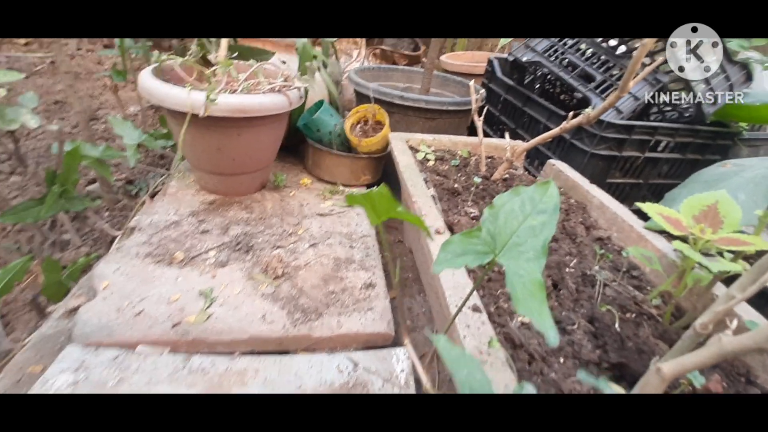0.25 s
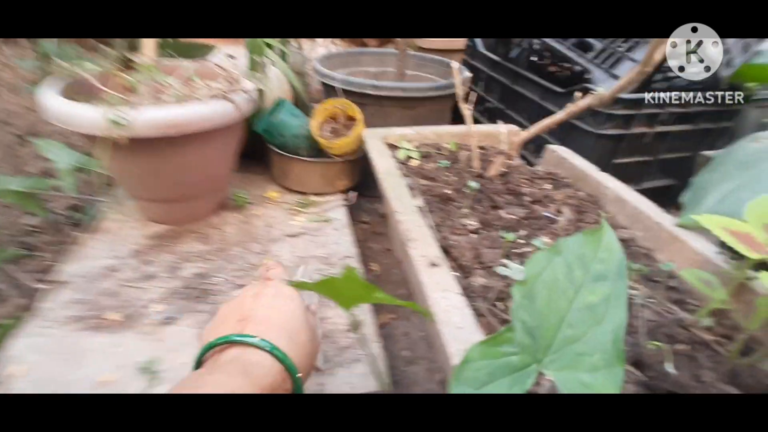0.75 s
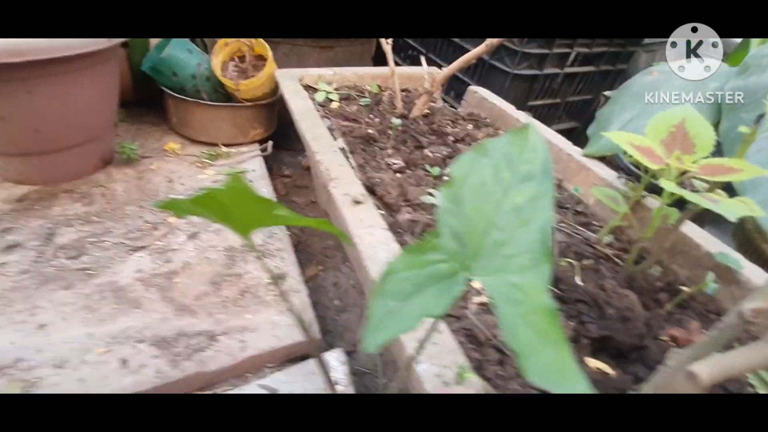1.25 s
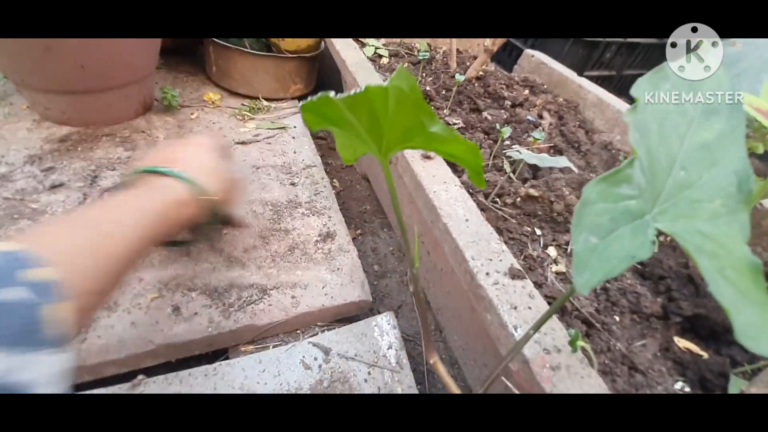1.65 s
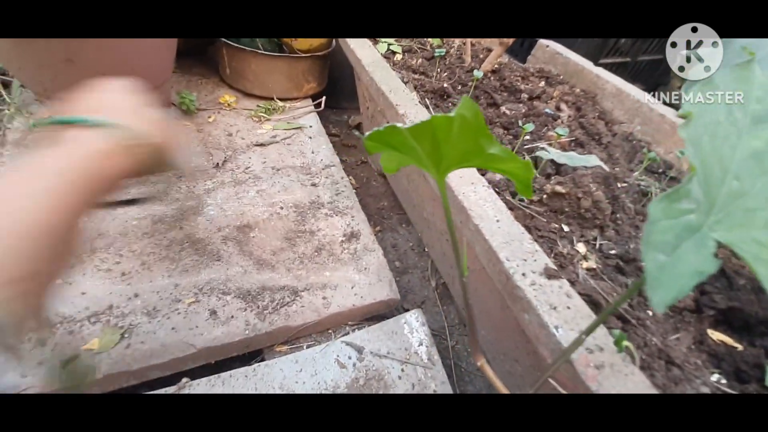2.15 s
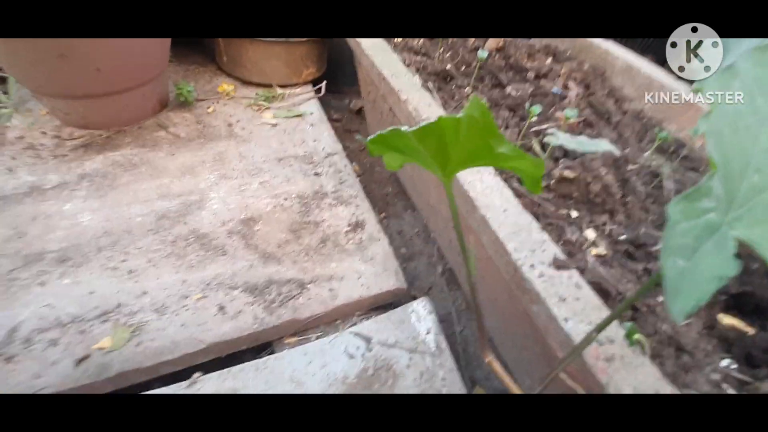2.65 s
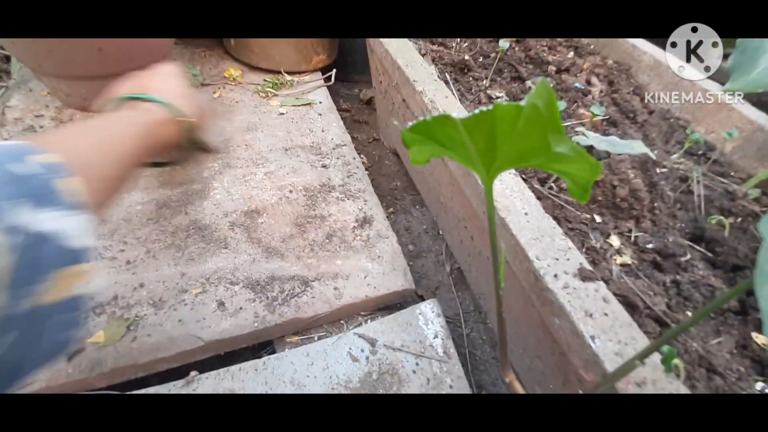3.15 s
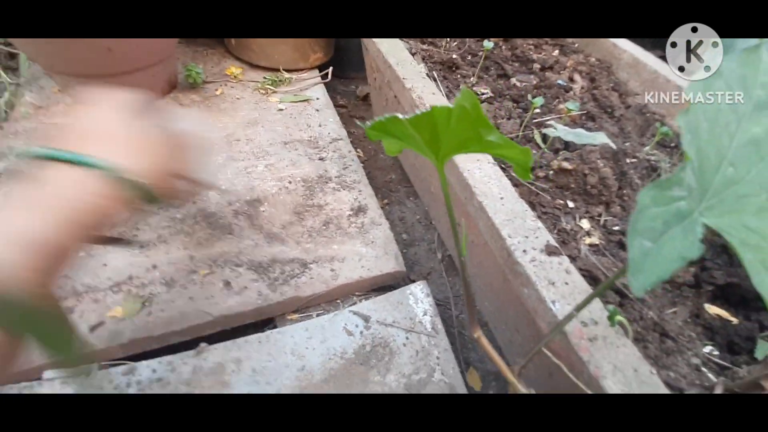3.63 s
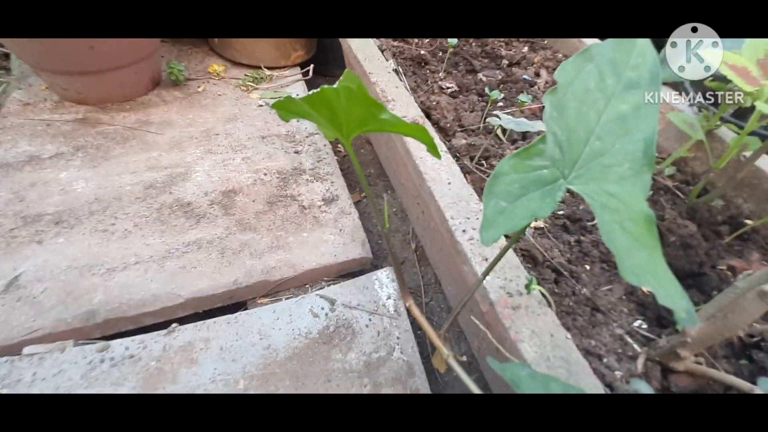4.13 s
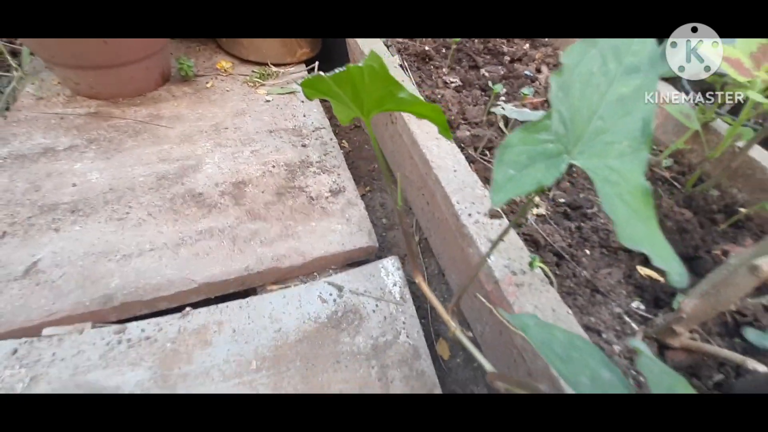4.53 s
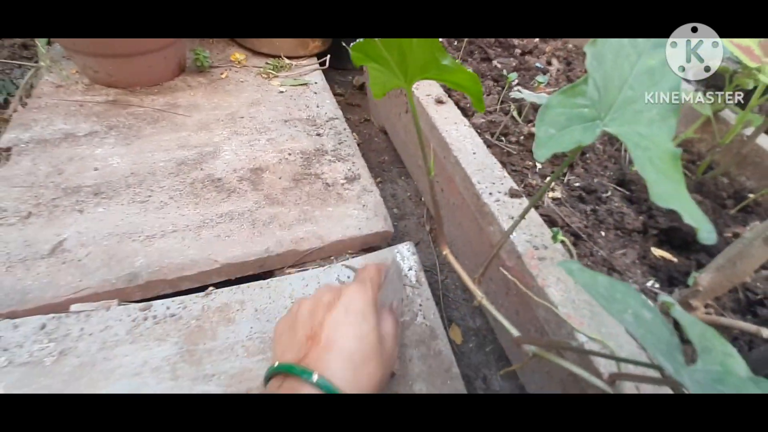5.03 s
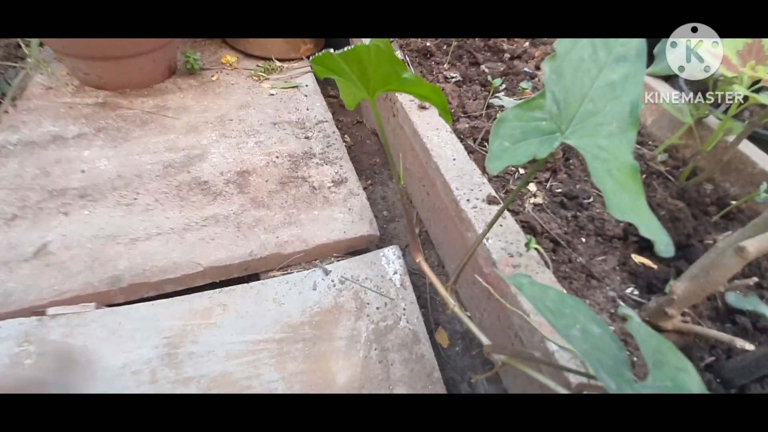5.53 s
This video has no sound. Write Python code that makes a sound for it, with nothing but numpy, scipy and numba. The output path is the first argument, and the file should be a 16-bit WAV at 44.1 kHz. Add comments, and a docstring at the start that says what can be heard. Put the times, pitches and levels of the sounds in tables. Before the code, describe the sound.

Close up outdoors, a scraper works dirt off a concrete slab: soft sweeps first, then repeated coarse rasps with brief squeaky chatter and clicks as the edge lands. Crumbs skitter after strokes and cloth rustles faintly in the gaps. Near the end come quick bright taps around a light scrape, then quiet. A handheld phone adds muffled handling thuds over low, wavering air rumble.

```python
"""At arm's length from a handheld phone with two microphone ports, a flat scraper works on a concrete slab.
First two light strokes push loose dirt: filtered grain clicks that hiss. From 1 s to 4.7 s the bare edge
rasps in seven strokes: grain clicks drive drifting modes, and decaying modes make the taps of landing.
From 5.1 s come more taps and a last light stroke. Between strokes crumbs and a sleeve rustle as filtered clicks;
throughout, fingers bump the phone (filtered pulses) and the garden rumbles (shaped noise) behind a faint echo."""
import sys
import numpy as np
from scipy import signal
from scipy.fft import rfft, irfft, next_fast_len
from scipy.io import wavfile
from scipy.ndimage import uniform_filter1d, map_coordinates
from numba import njit

SR = 44100
rng = np.random.default_rng(int(sys.argv[2]) if len(sys.argv) > 2 else 0)


def digitize_waveform(pressure):
    """Quantize a signal to 16-bit integers and store it at the path in sys.argv[1].

    Rows of a 2-D input are taken as channels; values are limited to [-1, 1].
    """
    field = np.atleast_2d(pressure).T
    bounded = np.clip(field, -1, 1)
    quanta = np.round(bounded * 32767).astype(np.int16)
    wavfile.write(sys.argv[1], SR, quanta)


N = 254898
T = np.arange(N) / SR  # t/s
SIZE = next_fast_len(N + SR, True)  # transform length, with a second to spare
HZ = np.maximum(np.arange(SIZE // 2 + 1) * SR / SIZE, 1)  # f/Hz of each transform bin

# Levels in the tables are relative; some sources add an overall trim.
# Bare edge on concrete: [bite t/s, hardest push t/s, lift t/s, level/dB, bite re hardest level/dB,
# lift re hardest level/dB, flexing at the lift level/dB]
SCRAPES = [ (1.004, 1.146, 1.248, -9.5, -12, -9, -2), (1.692, 1.850, 1.922, -10, -6, -9, 3.5),
           (2.430, 2.560, 2.651, -11, -3, -7, -5.5), (3.103, 3.122, 3.129, -31, -1, 0, -1),
           (3.165, 3.370, 3.452, -12.5, -5.5, 0, -8), (3.925, 4.079, 4.147, -9.5, -3.5, -1.5, -0.5),
           (4.598, 4.67, 4.713, -23.5, 0.5, -1, -13)]
# Light strokes through loose dirt: same columns as SCRAPES
SWEEPS = [ (0.195, 0.27, 0.28, -21.5, 0, 1, -11.5), (0.644, 0.767, 0.7745, -22, -10, -4, -22.5),
          (5.186, 5.304, 5.412, -19.5, 1.5, -2.5, 3.5)]
# Moments where the edge skims and loses grip (level drops) or the hand pushes in a surge (level rises): [t/s,
# change of level/dB]
GRIPS = [(0.238, -6.5), (1.734, 3.5), (1.788, -8.5), (3.224, -4), (3.258, 2), (3.31, -6.5), (4.05, 2),
         (4.649, 1.5), (5.239, -10), (5.37, -6.5)]
# The edge catches and chatters near one mode: [t/s, f/Hz, glide/(Hz/s), level/dB]
CHATTER = [(1.081, 3070, -2, -18), (1.17, 5310, -4, -15), (1.865, 2243, -1.5, -13),
           (2.526, 2883, -3000, -13.5), (2.578, 2035, 1999.5, -10.5), (3.259, 3142, 2997.5, -15.5),
           (3.275, 1319, -2.5, -11), (3.372, 4884, -3000, -11.5), (3.4, 2910, 1, -10.5),
           (4.139, 2084, 7.5, -10), (4.62, 3217, 9000, -22), (4.668, 2280, 3000, -27.5)]
# The edge lands or hits a stone: [t/s, level/dB, then re that: low flexing level/dB,
# lowest modes level/dB, upper modes level/dB, crushed grit level/dB; damping factor]
TAPS = [ (0.205, -2.5, -32, -18, -2, -26, 0.67), (0.2165, -16, -32, -20, -1, -12, 0.4),
        (0.964, -14, -1.5, 10, -9, -13, 1.24), (1.659, -6.5, -7.5, 8, -10, -10, 0.65),
        (2.382, -7.5, -14, 0.5, -15, -18.5, 1.26), (3.095, -9, -12, -6.5, -20, -20.5, 1.4),
        (3.893, -22.5, 0.5, 3, -7.5, -5.5, 0.8), (4.575, -9, -8.5, -13, 1, -9.5, 0.69),
        (4.693, -19, 8.5, -4, 12, 8, 1.8), (4.706, -25.5, 5.5, -12, 0, 1.5, 1.2),
        (5.134, -50, 22, 2, 6, -6, 1.7), (5.158, -17.5, -1.5, 3, -9, -5.5, 1.5),
        (5.176, -11, -5, 6.5, -4, -5.5, 0.94), (5.198, -1, -14, 6.5, -4.5, -3, 0.99),
        (5.254, -11.5, -7, 15, -14, -3.5, 0.83), (5.356, -8.5, -8, -10, 5, 2, 1.8),
        (5.379, -3, -13.5, -10, 4.5, 2, 0.81), (5.388, -5, -21, -7.5, 10.5, 5.5, 0.42),
        (5.405, -2.5, -16, -19, 4, -4, 0.85)]
# Modes of the scraper: [f/Hz, undamped width/Hz, rubbed level/dB, struck level/dB]
MODES = [(1212, 84, -1.5, -0.5), (2036, 52, -1, -1), (2263, 110, -8, -2.5), (2680, 170, -13, -12),
         (2931, 53, 5.5, -5), (3765, 88, -16.5, -5), (4180, 320, -9.5, 1.5), (4920, 240, -6, -0.5),
         (5020, 96, -5, -1), (6492, 120, 7, -18), (11074, 980, -9.5, -19), (12040, 2300, -19.5, -21)]
# Slow flexing of the scraper in the hand: [f/Hz, width/Hz, level/dB]
FLEX = [(233, 22, -6.5), (297.6, 97, 0), (360, 60, -0.5), (482, 150, -5)]
# Colour of grit under the edge: [f/Hz, level/dB]
GRIT = [(150, -23.5), (260, -15), (480, -5), (700, -6), (1050, 1.5), (2700, 0), (4000, -5.5), (5500, 2),
        (7500, -17.5), (9600, -21), (11800, -13), (15500, -26)]
# Colour of loose dirt: [f/Hz, level/dB]
LOOSE_DIRT = [(300, -11), (1000, 0), (2000, 0.5), (5200, 2.5), (7500, -7.5), (9600, -9.5), (12000, -10.5),
              (15500, -14.5)]
# Rustles of crumbs, sleeve and fingers: [t/s, half length t/s, level/dB, centre f/Hz, filter width/Hz]
RUSTLES = [(0.306, 0.1, -51.5, 1650, 2600), (0.547, 0.11, -54.5, 3230, 8900),
           (1.539, 0.041, -39.5, 170, 500), (2.062, 0.098, -54.5, 4800, 9860),
           (2.829, 0.023, -47.5, 5560, 12200), (4.356, 0.0017, -43.5, 3980, 4900),
           (4.386, 0.02, -47.5, 887, 1490), (4.793, 0.0091, -52, 4800, 11000),
           (5.033, 0.026, -52, 2900, 2000), (5.526, 0.078, -51.5, 4430, 8940)]
# Fingers on the phone, mostly beside the right port: [t/s, thud level/dB, knock re thud level/dB,
# left minus right level/dB]
BUMPS = [ (.287, -14, 8.5, -29.5), (0.441, -17.5, -12.5, -24), (.452, -26.5, 3, -23.5),
         (.791, -18, -17, -25), (1.076, -19, -12, -21.5), (1.333, -28, -36.5, -19.5),
         (1.416, -21.5, -16, -27), (2.519, -21, -15, -12.5), (2.981, -25.5, -36, -25.5),
         (3.297, -22.5, -21.5, -24.5), (3.639, -24, -45, -26.5), (4.38, -27.5, -2.5, -31),
         (5.38, -11.5, -15, 23), (5.574, -19.5, 0.5, -39), (5.643, -25.5, -12, -44)]
# Colour of a thud through the case: [f/Hz, level/dB]
BUMP = [(25, -39), (55, 1), (110, 5.5), (350, -9.5), (2000, -65)]
# Colour of the short knock: [f/Hz, level/dB]
KNOCK = [(80, -10), (300, 5.5), (700, -6.5), (1300, -17.5), (5000, -80)]
# Colour of the garden air: [f/Hz, level/dB]
GARDEN = [(22, -32.5), (50, -12.5), (130, -3), (400, -20.5), (900, -33), (2500, -31.5), (8000, -36.5),
          (10000, -38.5), (15000, -39)]
# Course of the low rumble: [t/s, level/dB]
RUMBLE = [(0.1, -3.5), (1.7, 6), (2.2, -8), (5.1, -2), (5.75, -10.5)]
# Balance of the two microphone ports: [f/Hz, left minus right level/dB]
PORT_BALANCE = [(300, 0.5), (1000, 1.5), (1500, -4), (3000, -1.5), (4500, -4), (6300, -0.5), (8000, 19),
                (10000, 11), (12000, 1.5), (15000, 6.5)]
# Sound common to both ports: [f/Hz, share of power]
PORT_LIKENESS = [(300, 1), (1200, 0.56), (2500, 0.36), (5000, 0.046), (12000, 0.66)]
# Lag of the right port, shorter in the bass: [f/Hz, lag t/s]
PORT_LAG = [(300, 0.00022), (1500, 0.00033)]

GARDEN_DB = -45.5  # base level/dB
TOP_HZ = 15600  # upper limit of the microphone f/Hz
GRIP_S = 0.011  # half length of each skim or surge t/s
DRAG_FLEX_DB, FLEX_RISE_S = -17.5, 0.052  # little flexing in mid-stroke, more as it tips up to lift


def scrapes(level_db=-0.87, flex_db=-1, ring_db=3, grit_db=-2.5, fine_db=-3, fine_per_db=0.2064,
            wander_db=5, judder_db=1.0, bite_db_per_s=1100, lift_db_per_s=1400, drift=0.017,
            stones_db=-10.5):
    """The edge judders over grit; its modes swell, fade and bend as the contact point shifts."""
    force_db, low_db = controls(SCRAPES, bite_db_per_s, lift_db_per_s)
    force = undb(force_db)
    push = grains(5000, 3.7) * undb(judder_db * walk(330) + 1.6 * walk(70))
    rasp = undb(grit_db) * patchy(filtered(push, colour(GRIT)))
    for hz, width, db, _ in MODES:
        gain = undb(db + ring_db + wander_db * walk(38))
        bent_hz = hz * (1 + drift * walk(30))
        rasp = rasp + gain * ringing(push, bent_hz, float(width))
    rasp = steady(hollowed(rasp)) + undb(stones_db) * stones()
    # a harder push crushes finer grit
    rasp = brighten(rasp, fine_db + fine_per_db * force_db)
    return undb(level_db) * force * rasp + flexing(push * force * undb(low_db + flex_db))


def controls(strokes, bite_db_per_s, lift_db_per_s):
    """Strokes bite, arch up to the hardest push, ease and lift: gives force and flexing level/dB."""
    levels, flexes = [], []
    for bite, hardest, lift, db, bite_db, lift_db, flex_db in strokes:
        before = np.clip((hardest - T) / (hardest - bite), 0, 1)
        after = np.clip((T - hardest) / (lift - hardest), 0, 1)
        off_slab = bite_db_per_s * np.maximum(bite - T, 0) + lift_db_per_s * np.maximum(T - lift, 0)
        levels.append(db + bite_db * before ** 2 + lift_db * after ** 2 - off_slab)
        tipped = np.exp(-(np.maximum(lift - T, 0) / FLEX_RISE_S) ** 2)
        flexes.append(DRAG_FLEX_DB + (flex_db - DRAG_FLEX_DB) * tipped)
    grip_db = sum(db * np.exp(-((T - s) / GRIP_S) ** 2) for s, db in GRIPS)
    strongest = np.argmax(levels, axis=0)
    return np.max(levels, axis=0) + grip_db, np.choose(strongest, flexes)


def patchy(push, depth_db=6, shifts_per_s=36, patch_hz=210):
    """Each patch of concrete grips differently, so bright spots keep shifting through the rasp."""
    hz, s, cells = signal.stft(push, SR, nperseg=512, noverlap=384)
    places = np.meshgrid(hz / patch_hz, s * shifts_per_s, indexing="ij")
    spots = map_coordinates(rng.standard_normal((256, 1024)), places, order=3, mode="wrap")
    _, sound = signal.istft(cells * undb(depth_db * spots), SR, nperseg=512, noverlap=384)
    return sound[:, :N]


def hollowed(x, node_hz=4000, width_hz=600, slide=0.12):
    """The blade stays still at one frequency between modes; this gap slides with the contact point."""
    return x - ringing(np.ascontiguousarray(x), node_hz * np.exp(slide * walk(11)), float(width_hz))


def steady(x, over_s=0.028):
    """Hold short-term power at 1: the hand's push sets it, the modes trade it among themselves."""
    power = uniform_filter1d(np.mean(x ** 2, axis=0), max(int(over_s * SR), 1))
    return x / np.sqrt(np.maximum(power, 1e-18))


def stones():
    """Coarse grains crack one by one under the edge."""
    return unit(filtered(grains(170, 1), colour(GRIT)))


def brighten(x, fine_db, split_hz=4200):
    """Weight the sound between coarse grit below the split and fine grit above it."""
    fine = filtered(x, 1 / (1 + (split_hz / HZ) ** 6))
    share = np.clip(undb(fine_db) ** 2, 0, .8)
    return (x - fine) * np.sqrt(2 * (1 - share)) + fine * np.sqrt(2 * share)


def flexing(push):
    """The whole scraper wobbles in the hand and rings on briefly, too small to radiate deep bass."""
    body = sum(undb(db) * resonance(hz, width) for hz, width, db in FLEX)
    radiation = colour([(130, -27.5), (220, 7.0), (380, 4.0), (560, -0.5), (1000, -14.5)])
    return filtered(push, unit(body * radiation))


def chatter(width_hz=200, half_s=.02):
    """The slips lock near one mode, which rings out of the rasp and slides as the edge turns."""
    push, out = grains(6000, 0.7), np.zeros((2, N))
    for s, hz, glide, db in CHATTER:
        near = np.abs(T - s) < .1
        age = T[near] - s
        swell = np.exp(-(age / half_s) ** 2)
        out[:, near] += undb(db) * swelling(push[:, near], swell, hz + glide * age, width_hz)
    # kept to the strokes, with 5 ms crossings at bite and lift
    touching = sum(1. * ((T >= bite) & (T <= lift)) for bite, _, lift, *_ in SCRAPES)
    return out * uniform_filter1d(touching, SR // 200)


def taps(ring_db=1, crunch_db=-1, fine_db=-5, crush_s=0.0025, skid_db=-25, skid_s=0.015,
         rebound_s=.0048, rebound_db=-7):
    """A landing rings the scraper, rebounds once, makes it flex, crushes a few grains and skids."""
    rings, crush, flex = np.zeros((2, N + SR)), 0, 0
    for s, db, low_db, body_db, top_db, grit_db, damping in TAPS:
        for when, blow_db in (s, db), (s + rebound_s, db + rebound_db):
            ring, at = strike(body_db, top_db, damping), int(when * SR)
            rings[:, at:at + ring.shape[1]] += undb(blow_db + ring_db) * ring
        age = np.abs(T - s)
        fade = np.exp(-np.minimum(age / crush_s, 20)) + undb(skid_db) * np.exp(-age / skid_s)
        force = undb(db) * (T >= s) * fade
        crush = crush + force * undb(grit_db + crunch_db)
        flex = flex + force * undb(low_db)
    push = grains(9000, 2.1)
    crunch = filtered(push * crush, unit(colour(LOOSE_DIRT) + mode_bank().sum(0)))
    return rings[:, :N] + brighten(crunch, fine_db) + flexing(push * flex)


def strike(body_db, top_db, damping, rise_s=0.00017, port_scatter=0.39, detune=.022):
    """A blow rings the modes: its place sets their strengths, firm contact damps and detunes them."""
    t = T[:SR // 5]
    hz, width, _, db = np.transpose(MODES)[:, :, None]
    gain = undb(db + np.interp(hz, [1300, 1950, 2300, 3700], [body_db, 0, 0, top_db]))
    start, apart, shift = rng.standard_normal((3, len(MODES), 1))
    hz = hz * (1 + detune * damping * shift)
    phase = 2 * np.pi * (hz * t + start)
    lag = 2 * np.pi * hz * np.interp(hz, *np.transpose(PORT_LAG)) + port_scatter * apart
    fade = gain * np.exp(-np.pi * width * damping * t) * (1 - np.exp(-t / rise_s))
    return np.sum(fade * np.sin([phase, phase - lag]), axis=1) * np.sqrt(2 / np.sum(gain ** 2))


def mode_bank():
    """Responses of the rubbed modes, one row each."""
    return np.array([undb(db) * resonance(hz, width) for hz, width, db, _ in MODES])


def sweeps(flex_db=-2.5, ring_db=-8, fine_db=-6.0, judder_db=1.5, bite_db_per_s=900,
           lift_db_per_s=850, stones_db=-17):
    """Loose dirt rolls under a light edge and hisses, barely ringing it."""
    force_db, low_db = controls(SWEEPS, bite_db_per_s, lift_db_per_s)
    force = undb(force_db) * (T >= TAPS[0][0])  # silent until the edge first lands
    push = grains(16000, 0.96) * undb(judder_db * walk(250))
    dirt = filtered(push, colour(LOOSE_DIRT) + undb(ring_db) * mode_bank().sum(0))
    hiss = steady(patchy(dirt, depth_db=4.5, shifts_per_s=85))
    hiss = brighten(hiss + undb(stones_db) * stones(), fine_db)
    return force * hiss + flexing(push * force * undb(low_db + flex_db))


def trickle(scatter_db=-31, scatter_s=0.017, settle_db=-46.5, settle_s=0.042, dust_db=-54, dust_s=0.22,
            follow=0.58):
    """Dirt flung off each stroke's end skitters and settles; fine dust hisses on a little longer."""
    def fading(db, decay_s):
        """A flow that starts at each lift and dies away; a harder stroke flings more."""
        flow = 0
        for _, _, lift, push_db, *_ in SCRAPES + SWEEPS:
            flow = flow + undb(follow * push_db) * (T >= lift) * np.exp(-np.abs(T - lift) / decay_s)
        return undb(db) * flow

    flow = fading(scatter_db, scatter_s) + fading(settle_db, settle_s)
    skitter = filtered(grains(2700, 6), unit(colour(LOOSE_DIRT) * resonance(1500, 7000)))
    crumbs = flow * undb(2 * walk(25)) * skitter
    dust = filtered(grains(9000, 3), unit(colour(LOOSE_DIRT) * resonance(8300, 23000)))
    return crumbs + fading(dust_db, dust_s) * dust


def rustles(flutter_db=3):
    """Crumbs tick, cloth brushes past as the arm swings back and fingers shift: swells of clicks."""
    push, out = grains(1900, 2.4) * undb(flutter_db * walk(180)), np.zeros((2, N))
    for s, half_s, db, hz, width in RUSTLES:
        near = np.abs(T - s) < 3 * half_s + .02
        swell = np.exp(-((T[near] - s) / half_s) ** 2)
        centre = np.full(len(swell), float(hz))
        out[:, near] += undb(db) * swelling(push[:, near], swell, centre, width)
    return out


def bumps(thud_db=1, knock_db=2):
    """Dull thuds through the phone's case, each with a short knock, loudest at the nearest port."""
    pulses = np.zeros((2, 2, N))  # thud or knock, port, time
    for s, db, hard_db, pan_db in BUMPS:
        ports = undb(np.minimum([pan_db, -pan_db], 0))
        pulses[:, :, int(s * SR)] = np.outer(undb([db + thud_db, db + hard_db + knock_db]), ports)
    shapes = colour(BUMP), colour(KNOCK)
    return sum(filtered(p, shape / np.abs(irfft(shape)).max()) for p, shape in zip(pulses, shapes))


def yard(x, echo_db=-22, t60_s=0.26):
    """Quick reflections from pots, bed edges and walls, as a decaying noise tail."""
    t = T[:SR]
    tail = rng.standard_normal((2, len(t))) * undb(-60 * t / t60_s) * (t > .004)
    echo = undb(echo_db) * tail / np.sqrt(np.sum(tail ** 2) / 2)
    return x + filtered(x, rfft(echo, SIZE) * resonance(2300, 3500))


def garden(shared_db=-3, deep_hz=85, rumble_db=-2.5, waver_db=4, hiss_db=-5, hiss_waver_db=2.2):
    """Wavering rumble under faint distant hiss; the deepest part is mostly each port's own moving air."""
    gusts = filtered(rng.standard_normal((2, N)), .5 + 3 / (1 + (HZ / deep_hz) ** 4))
    air = unit(filtered(undb(shared_db) * rng.standard_normal(N) + gusts, colour(GARDEN)))
    rumble = filtered(air, 1 / (1 + (HZ / 500) ** 4))
    hiss = (air - rumble) * undb(hiss_db + hiss_waver_db * walk(3.4))
    course_db = np.interp(T, *np.transpose(RUMBLE))
    return undb(GARDEN_DB) * (hiss + rumble * undb(rumble_db + course_db + waver_db * walk(39)))


def grains(per_s, spread_db):
    """Clicks of breaking grit, partly shared by both ports and slightly earlier at the left one."""
    struck = rng.random((3, N)) < per_s / SR
    sizes = rng.standard_normal((3, N)) * undb(spread_db * rng.standard_normal((3, N)))
    clicks = unit(struck * sizes)
    shared = np.clip(along(PORT_LIKENESS), 0, 1)
    ports = filtered(clicks[0], np.sqrt(shared)) + filtered(clicks[1:], np.sqrt(1 - shared))
    return np.array([ports[0], filtered(ports[1], right_port())])


def right_port():
    """Response that makes a sound reach the right port slightly later."""
    return np.exp(-2j * np.pi * HZ * along(PORT_LAG))


def swelling(push, swell, hz, width_hz):
    """Clicks through two equal resonances in a row, swelling and fading at a set level."""
    once = ringing(np.ascontiguousarray(push), hz, float(width_hz))
    ring = swell * ringing(once, hz, float(width_hz))
    return unit(ring) * np.sqrt(np.mean(swell ** 2))


@njit
def ringing(x, hz, width_hz):
    """One damped mode whose centre moves, at both ports."""
    out, band, low = np.empty_like(x), np.zeros(2), np.zeros(2)
    for i in range(len(hz)):
        g, k = np.tan(np.pi * hz[i] / SR), width_hz / hz[i]  # tuning and damping
        for c in range(2):
            v = (band[c] + g * (x[c, i] - low[c])) / (1 + g * (g + k))
            band[c], low[c], out[c, i] = 2 * v - band[c], low[c] + 2 * g * v, k * v
    return out


def resonance(hz, width_hz):
    """Response of one damped mode, gain 1 at its centre."""
    return 1 / (1 + 1j * (HZ / hz - hz / HZ) * hz / width_hz)


def colour(points):
    """Causal (minimum-phase) response with the given (f/Hz, level/dB) shape."""
    cepstrum = irfft(np.log(undb(along(points))), SIZE)
    cepstrum[1:SIZE // 2] *= 2
    cepstrum[SIZE // 2 + 1:] = 0
    return np.exp(rfft(cepstrum))


def along(points):
    """Join (f/Hz, value) points on a log-frequency axis."""
    hz, value = np.transpose(points)
    return np.interp(np.log(HZ), np.log(hz), value)


def filtered(x, response):
    """Pass a sound through a response."""
    return irfft(rfft(x, SIZE) * response, SIZE)[..., :N]


def walk(rate):
    """Random wandering, spread near 1: random points, so many per second, joined by straight lines."""
    knots = rng.standard_normal(N // 10)
    return 1.2 * np.interp(T * rate, np.arange(len(knots)), knots)


def undb(db):
    """Decibels to gain."""
    return 10 ** (np.asarray(db) / 20)


def unit(x):
    """Scale to rms 1."""
    return x / np.sqrt(np.mean(np.abs(x) ** 2))


def scene():
    """Scraping on the slab, a little to the left, over finger bumps and the quiet garden."""
    slab = yard(scrapes() + chatter() + sweeps() + taps() + trickle() + rustles())
    balance = undb(np.outer([.5, -.5], along(PORT_BALANCE)))
    return filtered(slab, balance) + bumps() + garden()


def record(dry):
    """The phone's ports notch the treble; it thins deep bass, flattens loud peaks and cuts the top."""
    ceiling, low_cut_hz, notch_hz, notch_width_hz = 0.95, 21, 9600, 510
    notched = filtered(dry, 1 - 0.84 * resonance(notch_hz, notch_width_hz))
    thinned = signal.sosfilt(signal.butter(2, low_cut_hz, "highpass", fs=SR, output="sos"), notched)
    rounded = thinned / (1 + (thinned / ceiling) ** 4) ** (1 / 4)
    return signal.sosfilt(signal.ellip(10, .2, 70, TOP_HZ, fs=SR, output="sos"), rounded)


dry = scene()
out = record(dry)
digitize_waveform(out)
```